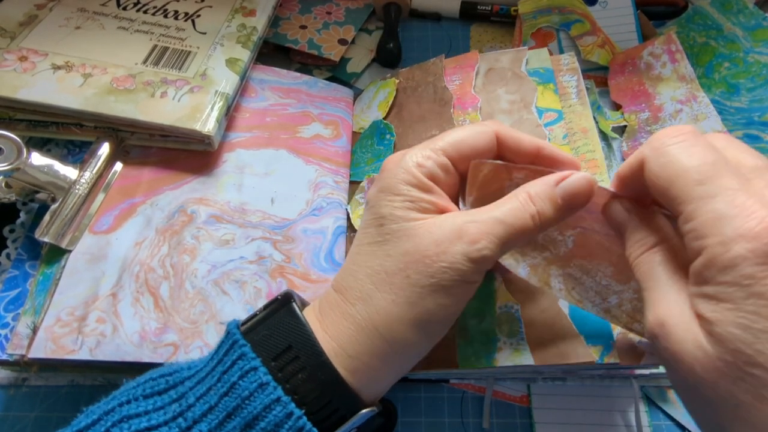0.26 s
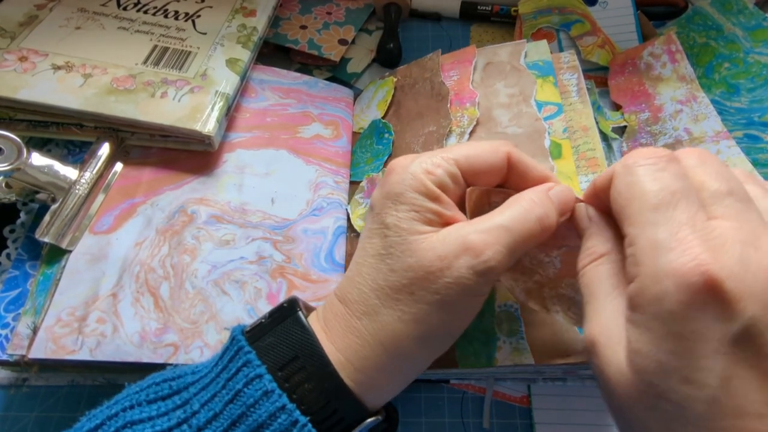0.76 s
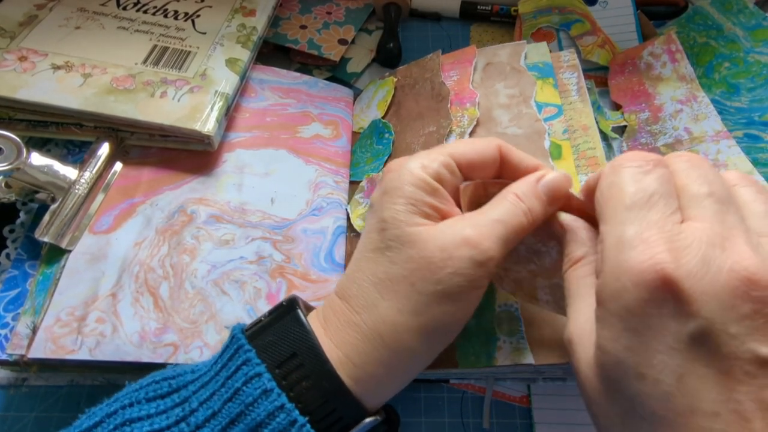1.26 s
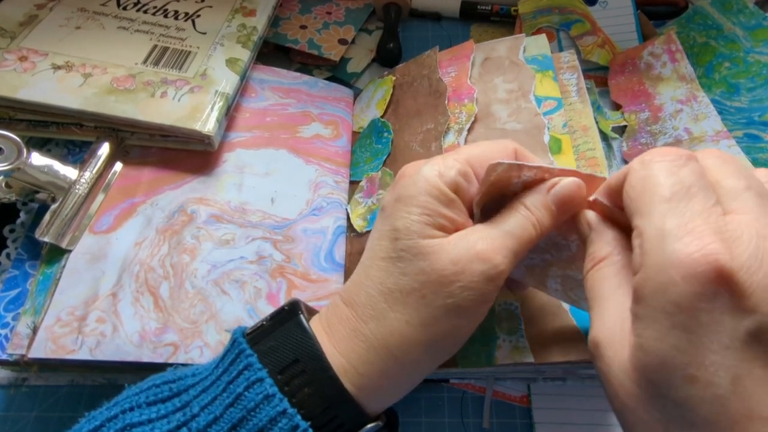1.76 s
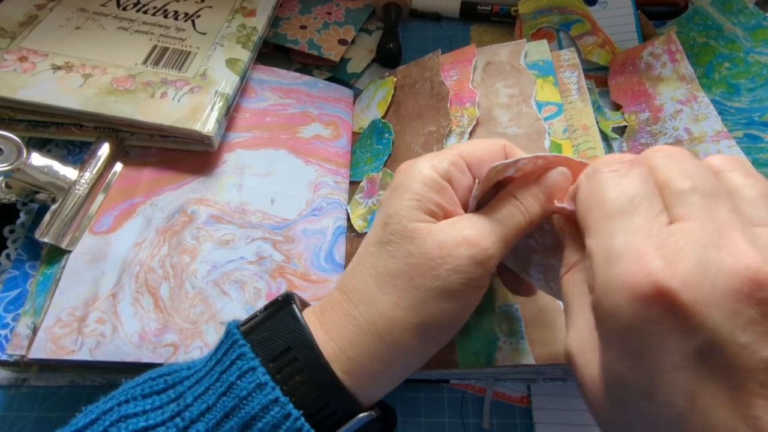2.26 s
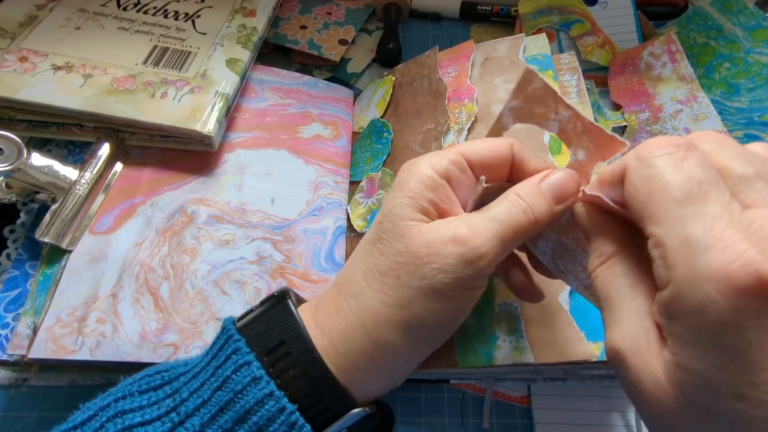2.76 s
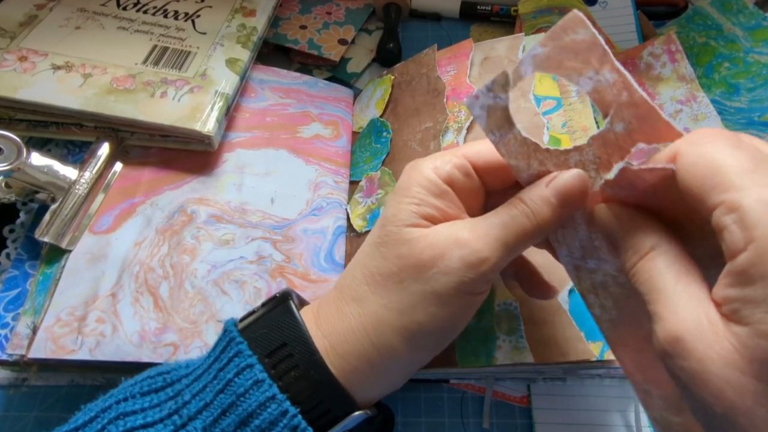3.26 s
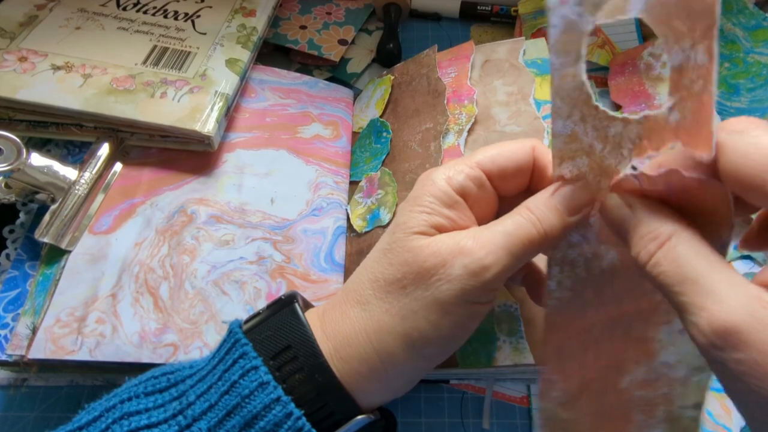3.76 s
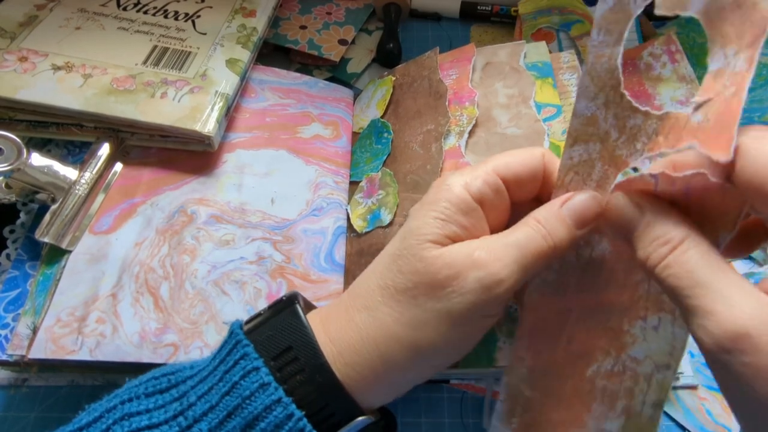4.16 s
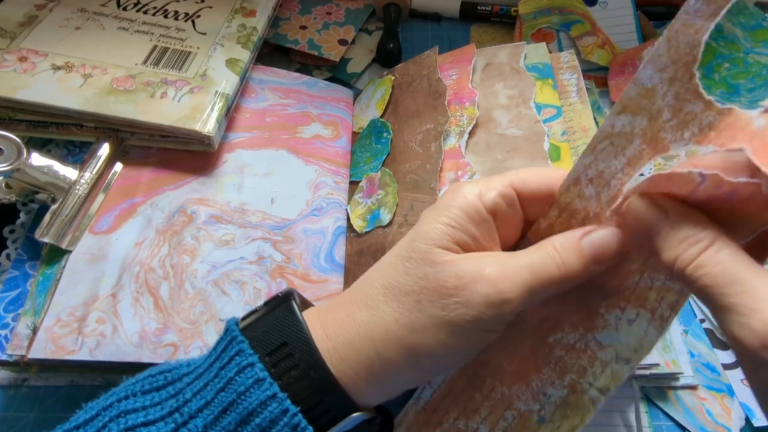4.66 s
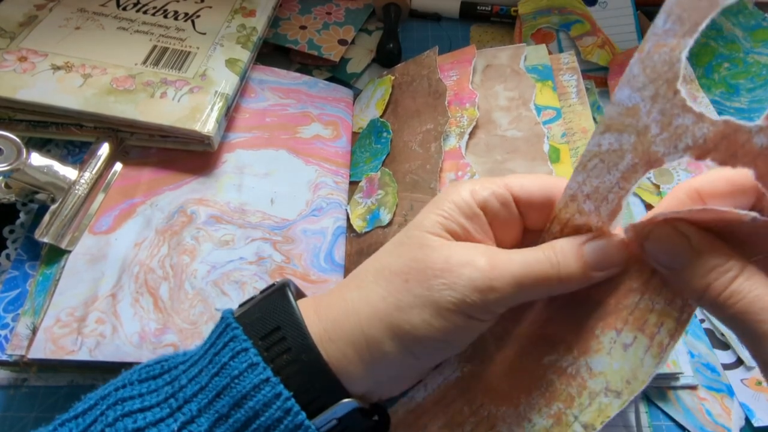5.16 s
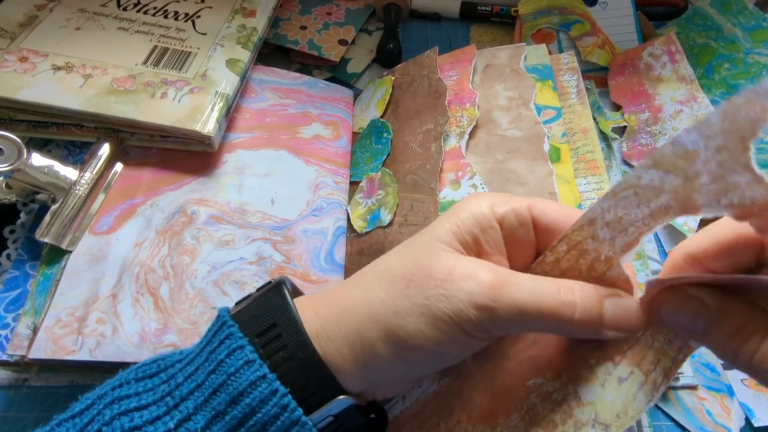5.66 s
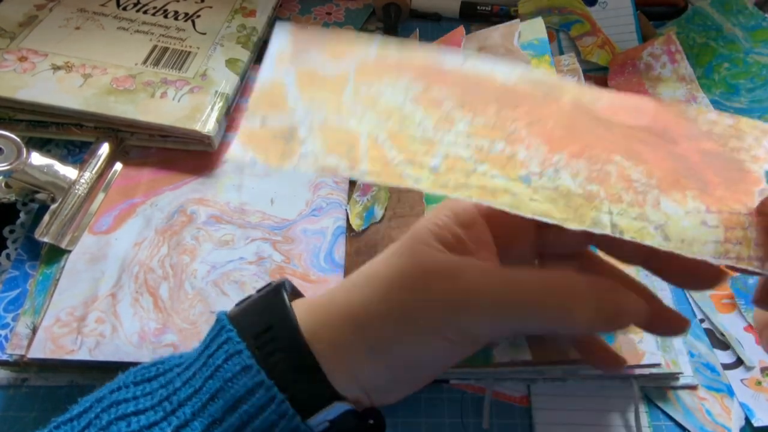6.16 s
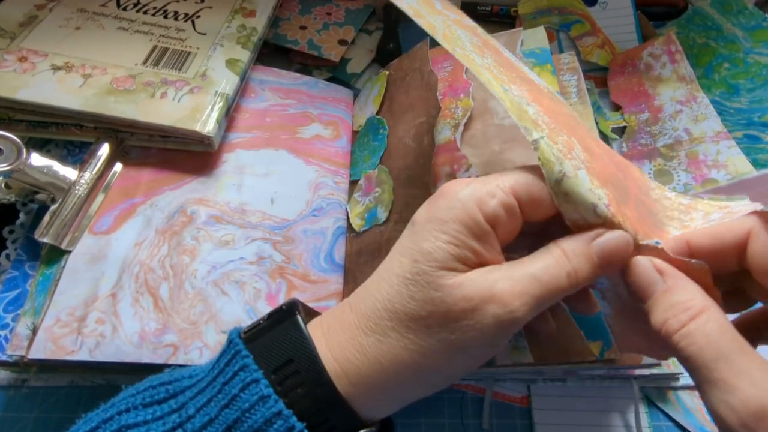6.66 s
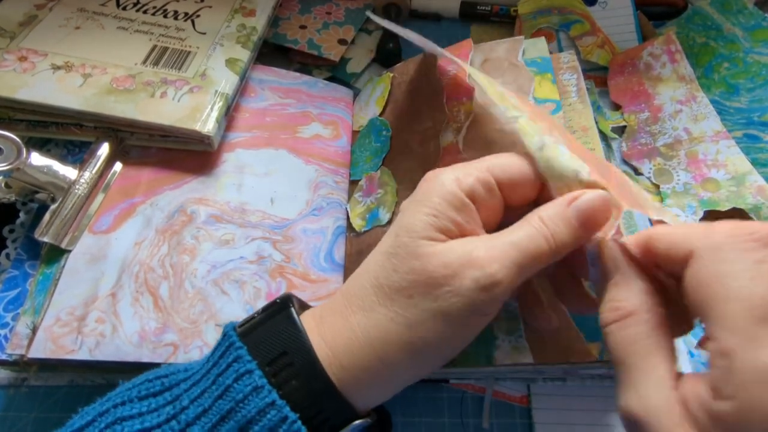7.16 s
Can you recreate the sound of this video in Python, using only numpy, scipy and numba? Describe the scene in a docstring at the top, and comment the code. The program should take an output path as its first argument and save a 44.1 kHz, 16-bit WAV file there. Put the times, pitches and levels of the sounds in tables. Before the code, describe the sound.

Close, crisp paper tearing in a quiet room. Light rustles and little rips come first, then stronger crackling pulls and sudden crinkling snaps, the sharpest one near the end. Fingers slide softly on the sheet between pulls, and the hands now and then nudge the desk with a faint low rumble. The sound is in stereo and nearly dry, with only a very short echo.

```python
"""Two hands tear a strip of paper in short pulls over a desk, heard close up and in stereo.
Thousands of fibres break each second, and their tiny clicks make the sheet ring. Between pulls
the fingers rub the sheet, and now and then a crease gives way with a snap. The hands move over
the desk and bump it with a low rumble. The desk and near walls add a short echo to the paper,
and a quiet room hums below it all."""
import sys
import numpy as np
from scipy import signal
from scipy.fft import rfft, irfft, next_fast_len
from scipy.io import wavfile
from scipy.ndimage import uniform_filter1d
from numba import njit

SR = 44100
rng = np.random.default_rng(int(sys.argv[2]) if len(sys.argv) > 2 else 0)


def transcribe(signal):
    """Save signal, clipped to [-1, 1], as a 16-bit WAV file at the path in sys.argv[1]."""
    frames = np.atleast_2d(signal).T
    limited = np.clip(frames, -1, 1)
    pcm = np.round(limited * 32767).astype(np.int16)
    wavfile.write(sys.argv[1], SR, pcm)


N = 326340
SECONDS = np.arange(0, N + 64, 64) / SR   # slow changes are worked out every 64 samples
# The paper's four ranges, low to high: the sheet flexing, its ring, a rasp and the fibres' hiss.
FLEX_HZ, RING_HZ, RASP_HZ, HISS_HZ = (160, 900), (900, 5000), (5000, 10000), (10000, 20000)


def from_db(db):
    return 10 ** (np.asarray(db) / 20)


def power_of(db):
    return from_db(2 * db)


def rms_one(x):
    return x / np.sqrt(np.mean(x ** 2) + 1e-20)


def in_time(rows):
    """Joins a table's rows with straight lines, giving one curve for each column after the time."""
    times, *columns = np.transpose(rows)
    return [np.interp(SECONDS, times, column) for column in columns]


def per_sample(control):
    return np.interp(np.arange(N) / SR, SECONDS, control)


def at_hz(points, hz):
    known_hz, values = np.transpose(points)
    return np.interp(np.log(hz), np.log(known_hz), values)


def band(x, edges_hz):
    return signal.sosfilt(signal.butter(2, edges_hz, "band", fs=SR, output="sos"), x)


def panned(x, pan_db):
    """Makes the left side pan_db louder than the right."""
    return x * from_db(np.vstack([pan_db / 2, -pan_db / 2]))


def drift(rate_hz):
    """A smooth random wander, usually between about -1 and 1."""
    pole = np.exp(-2 * np.pi * rate_hz / SR)
    smooth = signal.lfilter([1], [1, -2 * pole, pole * pole], rng.standard_normal(N + SR))
    return rms_one(smooth[SR:])


def swell(peak_s, rise_s, fall_s):
    """A hump in dB: 0 at its peak, -8.5 one rise earlier and one fall later."""
    width_s = np.where(SECONDS < peak_s, rise_s, fall_s)
    return -8.5 * np.abs((SECONDS - peak_s) / width_s) ** 1.82


def dying_noise(fade_s, length_s):
    """Two noise bursts that fall 60 dB in fade_s."""
    t = np.arange(round(length_s * SR)) / SR
    return rng.standard_normal((2, len(t))) * from_db(-60 * t / fade_s)


@njit
def resonance(x, hz, q):
    """Picks out a pitch that may move over time; a higher q makes it narrower."""
    out = np.zeros_like(x)
    for c in range(x.shape[0]):
        for i in range(2, x.shape[1]):
            angle = 2 * np.pi * hz[i] / SR
            decay = np.exp(-angle / q / 2)
            push = (1 - decay ** 2) / 2 * (x[c, i] - x[c, i - 2])
            out[c, i] = push + 2 * decay * np.cos(angle) * out[c, i - 1] - decay ** 2 * out[c, i - 2]
    return out


# How alike left and right sound. Each row: frequency in Hz, likeness (0 unrelated, 1 the same).
LIKENESS = [(60, 0.86), (180, 0.8), (550, 0.67), (1650, 0.53), (4970, 0.017), (15000, 0.18)]


def stereo(mid, side, colour):
    """Mixes two signals into left and right, then gives them a tone colour."""
    size = next_fast_len(mid.shape[-1] + 1024)
    hz = np.maximum(np.arange(size // 2 + 1) * SR / size, 1)
    alike = at_hz(LIKENESS, hz)
    shared = np.sqrt(1 + alike) * rfft(mid, size)
    opposed = np.sqrt(1 - alike) * rfft(side, size) * [[1], [-1]]
    return irfft((shared + opposed) * from_db(at_hz(colour, hz)), size)[:, :mid.shape[-1]]


# Fingers sliding on the sheet. Each row: time in seconds, ring level in dB, hiss level in dB,
# flex level in dB, left over right in dB (for the pulls too).
RUBBING = [(0.0, -54.5, -63.5, -71, 1), (0.47, -58, -64, -83, 1), (0.7, -60, -110, -80, 2),
           (0.95, -60, -58, -87, 0.5), (1.17, -61, -65.5, -79, 2), (2.1, -55, -62, -70, 1.5),
           (2.58, -59.5, -64, -71, 2.5), (2.8, -55.5, -63, -66, 1.5), (3.42, -58.5, -68, -74, 1),
           (4.08, -52.5, -53.5, -66, 1.5), (4.53, -56.5, -65, -68, 0.5), (5.21, -58, -62.5, -92, 1.0),
           (5.89, -53.5, -60.5, -74, 1.5), (6.1, -61, -67, -69, 0), (6.72, -57, -59.5, -77.5, 0),
           (7.4, -60, -66.5, -67, 1.5)]
# The fingers let go for a moment. Each row: middle in seconds, length in seconds, dip in dB.
PAUSES = [(0.055, 0.051, -4), (0.183, 0.017, -10), (0.434, 0.018, -13), (0.602, 0.015, -30),
          (0.714, 0.2, -6), (0.903, 0.15, -21), (0.96, 0.015, -7), (1.202, 0.021, -1.5),
          (1.717, 0.03, -3.5), (2.033, 0.06, -5), (2.101, 0.074, -17), (2.378, 0.037, -9),
          (2.548, 0.018, -7.0), (2.669, 0.021, -13), (3.04, 0.043, -39), (3.392, 0.06, -0.5),
          (3.74, 0.016, -24), (3.888, 0.027, -6.5), (4.605, 0.091, -28), (5.4, 0.023, -12),
          (5.857, 0.15, -5.5), (6.687, 0.068, -8), (6.926, 0.048, -21)]


def rubbing():
    """Gives the power and left-right balance of the rubbing; pauses hush its ring and hiss."""
    ring_db, hiss_db, flex_db, pan_db = in_time(RUBBING)
    hush_db = sum(dip_db * np.exp(-(2 * (SECONDS - middle_s) / length_s) ** 2)
                  for middle_s, length_s, dip_db in PAUSES)
    return power_of(ring_db + hush_db), power_of(hiss_db + hush_db), power_of(flex_db), pan_db


# Pulls on the strip. Each row: peak time, rise and fall in seconds, ring level in dB,
# ring pitch in Hz, hiss over ring in dB, flex over ring in dB.
PULLS = [(0.03, 0.057, 0.022, -63, 2200.0, -1, -23), (0.145, 0.042, 0.059, -59, 2420, -28, -2.5),
         (0.374, 0.024, 0.047, -49, 2120, -4.5, -31), (0.519, 0.049, 0.12, -54, 2640, -8.5, -37),
         (0.634, 0.013, 0.056, -59, 2040, -14, -23), (0.803, 0.016, 0.052, -58, 2180.0, -33, -16.5),
         (0.998, 0.016, 0.021, -54, 2900.0, 2, -29), (1.182, 0.056, 0.02, -60, 2450.0, -6, -28),
         (1.29, 0.028, 0.02, -54.5, 2740, 6, -28), (1.361, 0.044, 0.017, -51.0, 2400, -2.5, -7.5),
         (1.631, 0.019, 0.031, -57, 2900.0, 8.5, -6.0), (1.675, 0.03, 0.011, -66.5, 2790.0, 17.5, -12),
         (1.871, 0.075, 0.063, -51, 2560, -1, -26), (1.93, 0.023, 0.049, -56.5, 2950.0, 7, -14.0),
         (2.07, 0.021, 0.03, -69, 3280.0, 16.5, -27), (2.165, 0.032, 0.018, -69, 2510.0, 15.5, -9.0),
         (2.231, 0.014, 0.036, -50.5, 1990.0, 2, 1), (2.303, 0.051, 0.042, -47, 3230, 1.5, -16),
         (2.429, 0.014, 0.033, -57.5, 2970, 6.5, -26), (2.594, 0.018, 0.028, -51.5, 2020, 1, -28),
         (2.769, 0.057, 0.027, -49, 2470, 2, -1), (2.903, 0.022, 0.054, -49, 2920, 3, -6.5),
         (2.95, 0.032, 0.03, -53.5, 2500.0, 9, -1), (3.138, 0.068, 0.04, -49, 2300, -5, -6.5),
         (3.225, 0.027, 0.018, -53.5, 2500, -0.5, 1), (3.29, 0.062, 0.041, -54, 2880, 0, -16.0),
         (3.47, 0.031, 0.023, -49, 2630, 11.5, -11), (3.52, 0.01, 0.011, -66, 2770.0, 10, -17),
         (3.644, 0.01, 0.05, -51, 2500, 2.5, -2.5), (3.71, 0.027, 0.026, -52.5, 2530, -5, -1),
         (3.848, 0.053, 0.027, -46.5, 2050, -4, -20), (3.948, 0.013, 0.042, -33, 1600, -0.5, -18),
         (4.01, 0.045, 0.018, -58, 2230.0, 15, -1), (4.11, 0.016, 0.046, -53.5, 2570, 7, -26),
         (4.204, 0.036, 0.0071, -49.5, 2030.0, -13, -4), (4.265, 0.044, 0.025, -51.5, 1760, -2, -3),
         (4.35, 0.014, 0.037, -51.5, 2050, -7.0, -23), (4.452, 0.034, 0.031, -35, 2100, -3.5, -13.5),
         (4.608, 0.018, 0.093, -53, 1500, -5, -2), (4.749, 0.034, 0.079, -46.5, 1800, -12, -13.5),
         (4.914, 0.079, 0.035, -51.5, 1930, -9, -22), (5.113, 0.046, 0.039, -37.5, 1820, -7.0, -32),
         (5.302, 0.02, 0.12, -52.5, 1600, -7.5, -8.0), (5.458, 0.035, 0.067, -54, 2220.0, -0.5, -7),
         (5.63, 0.01, 0.035, -51, 2570.0, -8, -25), (5.727, 0.021, 0.059, -47, 3580, 3, -28),
         (5.8, 0.036, 0.021, -61, 3420, 10, -20), (5.922, 0.0094, 0.11, -54, 2750.0, 1.5, -8.5),
         (6.022, 0.025, 0.052, -39, 1700, -11.5, -12), (6.127, 0.044, 0.053, -50, 1970, -3, -10),
         (6.37, 0.019, 0.018, -49, 2360.0, 2, -16), (6.415, 0.034, 0.034, -39.5, 2240, -3, -13),
         (6.46, 0.02, 0.023, -48, 2400.0, -3, -10), (6.55, 0.03, 0.035, -55.0, 1910, 2, -9),
         (6.77, 0.042, 0.049, -54.5, 2340, 5, -20), (7.052, 0.038, 0.073, -45, 1920, 2.5, -10),
         (7.13, 0.019, 0.037, -51.5, 2080, 6.5, -23), (7.23, 0.09, 0.074, -55, 2020, -1, -14)]


def pulls(ring, hiss, flex, pan_db, rub_hz=2180):
    """Each pull adds its power to the rubbing; the strongest has the most say in the pitch."""
    pitch_sum = ring * rub_hz
    for peak_s, rise_s, fall_s, db, hz, hiss_db, flex_db in PULLS:
        power = power_of(db + swell(peak_s, rise_s, fall_s))
        ring = ring + power
        hiss = hiss + power * power_of(hiss_db)
        flex = flex + power * power_of(flex_db)
        pitch_sum = pitch_sum + power * hz
    ring_db, hiss_over_db, flex_over_db = 10 * np.log10([ring, hiss / ring, flex / ring])
    return ring_db, pitch_sum / ring, hiss_over_db, flex_over_db, pan_db


def fibre_breaks(crackle, breaks_per_s=7000):
    """Fibres break as clumps of tiny clicks; more crackle makes their sizes more uneven."""
    single_db = 4.1 * np.minimum(rng.exponential(1, N), 5)
    clump_db = 1.6 * drift(rate_hz=67)
    sizes = from_db(crackle * (single_db + clump_db)) * rng.choice([-1, 1], N)
    breaks = sizes * (rng.random(N) < breaks_per_s / SR)
    nearby_power = uniform_filter1d(breaks ** 2, size=SR // 20)
    return breaks / np.sqrt(nearby_power + 1e-9)   # evened out, so the hands set the loudness


@njit
def shake_sheet(breaks, patch, bursts):
    """Every break sets off the short burst that belongs to its patch of paper."""
    out = np.zeros((2, len(breaks)))
    for i in range(len(breaks)):
        if breaks[i] != 0:
            for c in range(2):
                for j in range(min(bursts.shape[2], len(breaks) - i)):
                    out[c, i + j] += breaks[i] * bursts[patch[i], c, j]
    return out


# The tone colour of the paper, used by the snaps too. Each row: frequency in Hz, level in dB.
PAPER_COLOUR = [(120, -59), (200, -9.5), (334, 1.5), (681, -7), (964, -1.5), (1270, -4.5), (1440, -2.5),
                (1900, -2.5), (3460, -2), (5090, -6.5), (6220, -6), (8180, -8), (8960, -4.5), (15500, 3),
                (15950, -31)]


def tearing(patches_per_s=30):
    """The tear creeps from patch to patch, and each patch colours the breaks in its own way."""
    ring_db, ring_hz, hiss_over_db, flex_over_db, pan_db = map(per_sample, pulls(*rubbing()))
    crackle = np.clip((ring_db + 66) / 18, .3, 1)   # light rubbing is smooth, hard pulls crackle
    breaks = fibre_breaks(crackle)
    bursts = np.array([dying_noise(fade_s=.005, length_s=.01) for _ in range(200)])
    position = np.arange(N) / SR * patches_per_s + 1.6 * rng.random(N)
    patch = position.astype(int) % len(bursts)
    sheet = stereo(*shake_sheet(breaks, patch, bursts), PAPER_COLOUR)
    # Each range swells and sinks a little on its own.
    flex, ring, rasp, hiss = (rms_one(band(sheet, edges_hz) * from_db(1.6 * drift(rate_hz=10.4)))
                              for edges_hz in (FLEX_HZ, RING_HZ, RASP_HZ, HISS_HZ))
    # The taut flap favours one pitch.
    ring = rms_one(ring + 1.5 * crackle * resonance(ring, ring_hz, q=2.05))
    # The rasp gets higher and louder as the hiss grows.
    rasp_hz = np.clip(7040 + 66 * hiss_over_db, *RASP_HZ)
    rasp = rms_one(rasp + 0.77 * resonance(rasp, rasp_hz, q=36.0))
    rasp *= from_db(1 + 0.66 * hiss_over_db)
    hiss *= from_db(hiss_over_db)
    flex *= from_db(flex_over_db)
    paper = flex - ring + rasp - hiss   # opposite signs keep neighbouring ranges from cancelling
    return panned(paper * from_db(ring_db), pan_db)


def desk_echo(paper, fade_s=.1, level_db=-15):
    """The desk and near walls send back a short, blurred echo, different on each side."""
    tail = dying_noise(fade_s, length_s=fade_s)
    tail /= np.sqrt(np.sum(tail ** 2, axis=1, keepdims=True))
    return from_db(level_db) * signal.oaconvolve(paper, tail, axes=1)[:, :N]


# The tone colour of the rumble. Each row: frequency in Hz, level in dB.
RUMBLE_COLOUR = [(18, -53), (30, -29), (48, -1.5), (102, 3), (203, -0.5), (240, -5.5), (310, -2.5),
                 (530, -120)]
# Hands moving over the desk. Each row: time in seconds, level in dB.
HAND_MOVES = [(0.0, -70), (0.66, -72), (2.14, -68), (2.76, -73), (5.81, -69.5), (7.4, -80)]
# A hand knocks the desk or jerks the sheet. Each row: peak time in seconds, level in dB.
BUMPS = [(0.155, -64.0), (0.419, -71), (0.629, -77), (1.008, -67.0), (1.137, -67.0), (1.368, -52.5),
         (1.636, -60.0), (1.831, -59.5), (1.985, -61.0), (2.235, -51), (2.639, -57.5), (3.113, -60.0),
         (3.662, -59), (3.776, -69), (4.051, -60.0), (4.21, -61), (4.465, -54), (4.605, -61.5),
         (5.333, -60), (6.021, -50.5), (6.361, -65), (6.425, -60.0)]


def hand_rumble():
    """The moving hands make a low, lumpy noise, a little to the left, that swells at each bump."""
    low = rms_one(stereo(*rng.standard_normal((2, N)), RUMBLE_COLOUR))
    moving = power_of(in_time(HAND_MOVES)[0])
    bumping = sum(power_of(db + swell(peak_s, rise_s=.03, fall_s=.031)) for peak_s, db in BUMPS)
    level = per_sample(np.sqrt(moving + bumping))
    wobble = from_db(2 * drift(rate_hz=15))
    return panned(low * level * wobble, pan_db=2.5)


# The tone colour of the room. Each row: frequency in Hz, level in dB.
ROOM_COLOUR = [(120, -5), (200, -10), (305, 8), (879, -2), (1240, -33), (1930, -9), (3160, -30),
               (15800, -20)]


def room_tone(level_db=-76.5):
    """The air of the room makes a faint, steady noise."""
    return from_db(level_db) * rms_one(stereo(*rng.standard_normal((2, N)), ROOM_COLOUR))


# Creases and sudden rips. Each row: start in seconds, the ring's peak in dB, ring pitch in Hz,
# thump pitch in Hz, then rasp, hiss and thump levels in dB over that peak, left over right in dB.
SNAPS = [(0.393, -34, 1960, 328, -10.5, -7, -26.5, 2), (0.4236, -34.5, 2050, 890, -31, -25, -18.5, 0),
         (0.4595, -40, 2810, 842, -14, -17, -27, -0.5), (0.62, -38.5, 1770, 614, -11.5, -15, -35, 0),
         (0.6396, -39, 1840, 891, -18, -15, -38, 0.0), (0.6634, -41.5, 1780, 668, -14, -14, -36, -1.0),
         (0.7227, -44.5, 1890, 310, -13, -13, -35, -1), (0.7598, -47, 2270, 826, -22, -23, -23, 2.0),
         (0.7968, -46.5, 2200, 829, -41, -37, -27, -3), (0.8825, -79, 902, 342, -1, 6, -8, -1.0),
         (0.923, -54.5, 2110, 285, -9, 3, -26, -1.5), (0.9911, -47, 3010, 245, -6, 7, -13.5, 0),
         (1.181, -49, 1970, 409, -2, -1, -18, 0.5), (1.3256, -35, 2060, 420, -16, -22, -17, -2),
         (1.6216, -44.5, 1660, 514, -20, 2, -14, 3), (1.8153, -29, 2080, 385, -16.5, -19, -13.5, 1),
         (1.8627, -34.5, 4200, 493, -3.5, -3, -41, 4), (1.9631, -23, 2600, 775, -21.5, -33, -18, 2),
         (2.0527, -53, 4400, 304, -4, 8, -22, 1.5), (2.1266, -48, 3270, 867, -8, -3, -17, 3.5),
         (2.2183, -22, 2300, 457, -19.5, -25, -17, 3.5), (2.2373, -29.5, 2200, 505, -26, -25, -12, 0),
         (2.4245, -50, 3040, 350, -4, 4, -11, 2.5), (2.582, -54, 1750, 899, 2, -1, -20, 1.5),
         (2.616, -30.5, 1610, 732, -38, -26, -20.5, 2), (2.647, -50, 934, 280, -24, -24, 0, 6),
         (2.7152, -23, 2270, 756, -22, -29, -20, 3), (2.7511, -38, 3930, 259, -5, 2, -24, 7),
         (2.7818, -30, 2260, 850, -26, -2, -33, 1), (2.8906, -40.5, 4460, 358, -6, -3, -19, 4),
         (3.1071, -36.5, 1840, 318, -6, -11, -6, 1), (3.1439, -23, 3400, 670, -28, -30, -20, 0.5),
         (3.1928, -39.5, 895, 450, -14, -15, -8.5, -2), (3.4382, -44, 3890, 497, -2, -6, -16, 1.0),
         (3.463, -35, 2450, 905, -12, -11, -19, 1), (3.5602, -49, 1840, 860, 1.5, 7, -38, 3.0),
         (3.6334, -48, 2100, 315, 0, 5, -20, 1), (3.76, -32, 2650, 423, -14, -11, -19, 1),
         (3.9372, -25, 1450, 900, -13, -8, -19.5, 2.0), (3.9494, -22, 2700, 890, -29, -21, -37, -6),
         (4.0438, -25.5, 1450, 590, -15.5, -21, -16.5, 1), (4.1442, -34.5, 1060, 732, -14, -12, -21, 2.0),
         (4.197, -19, 1800, 744, -13.5, -11, -40, 0.5), (4.261, -29, 1220, 576, -13, -17, -23, 0.0),
         (4.3907, -42.5, 2690, 890, -4, 10, -31, 1.5), (4.4398, -17.5, 880, 920, -33, -24, -20.5, -1),
         (4.5979, -33.5, 1780, 420, -16, -13, -26, 0), (4.6267, -38, 1440, 342, -10, -7, -26, 0),
         (4.7502, -31.5, 1010, 900, -24, -25, -11, 0), (5.031, -36, 2240, 864, -12.5, -7.5, -30, 2),
         (5.0848, -28.5, 1820, 425, -10.5, -8, -31, 5), (5.3029, -26.5, 1030, 880, -18.5, -21, -17, 3),
         (5.5922, -40.5, 2170, 297, -5, -2.5, -44, -2), (5.673, -33, 2100, 864, -9.5, -7.5, -47, 0),
         (5.7216, -27.5, 3880, 872, -9, -13, -43, 1), (5.824, -41.5, 3980, 810, -7, 1.5, -26, 1),
         (5.9135, -48.5, 3660, 759, -1, -1, -28, 5), (6.0084, -12, 1530, 890, -32, -37, -21, 2),
         (6.0327, -24, 2040, 877, -24, -29, -20, 1), (6.1215, -36.5, 1480, 775, -17, -24, -16, -7),
         (6.3544, -44, 2790, 743, -3.5, -15, -17, -4), (6.4098, -17, 1410, 734, -15.5, -13.5, -23.5, 1.5),
         (7.0334, -31, 2090, 708, -9, -4, -33, 1), (7.0506, -30, 2330, 850, -20, -2, -17.5, 0.0)]


def crease_snaps(ring_fade_s=.034, length_s=.06):
    """A crease lets go in a burst: a ring at its own pitch, a quicker bright crack, a slower thump."""
    out = np.zeros((2, N + SR))
    length = round(length_s * SR)
    head = round(.01 * SR)   # the first 10 ms set the level of rasp, hiss and thump
    rise = np.minimum(np.arange(length) / (.001 * SR), 1)   # the crease takes a moment to run
    for start_s, peak_db, ring_hz, thump_hz, rasp_db, hiss_db, thump_db, pan_db in SNAPS:
        ring, crack, thump = (stereo(*dying_noise(stretch * ring_fade_s, length_s) * rise, PAPER_COLOUR)
                              for stretch in (1, .6, 1.6))
        ring = band(ring, RING_HZ)
        ring += 1.5 * resonance(ring, np.full(length, float(ring_hz)), q=3.0)
        thump = band(thump, FLEX_HZ)
        thump += 2.9 * resonance(thump, np.full(length, float(thump_hz)), q=5.9)
        rasp, hiss = band(crack, RASP_HZ), band(crack, HISS_HZ)
        burst = ring / np.abs(ring).max()
        for layer, db in (rasp, rasp_db), (hiss, hiss_db), (thump, thump_db):
            burst += layer / np.std(layer[:, :head]) * from_db(db)
        start = round(start_s * SR)
        out[:, start:start + length] += panned(burst * from_db(peak_db), pan_db)
    return out[:, :N]


def scene():
    """The paper and its echo sit on top of the hands' rumble and the room."""
    paper = tearing() + crease_snaps()
    return paper + desk_echo(paper) + hand_rumble() + room_tone()


def record(dry):
    """Cuts the highest treble steeply, above 15950 Hz."""
    return signal.sosfilt(signal.ellip(14, .3, 60, 15950, fs=SR, output="sos"), dry)


dry = scene()
out = record(dry)
transcribe(out)
```